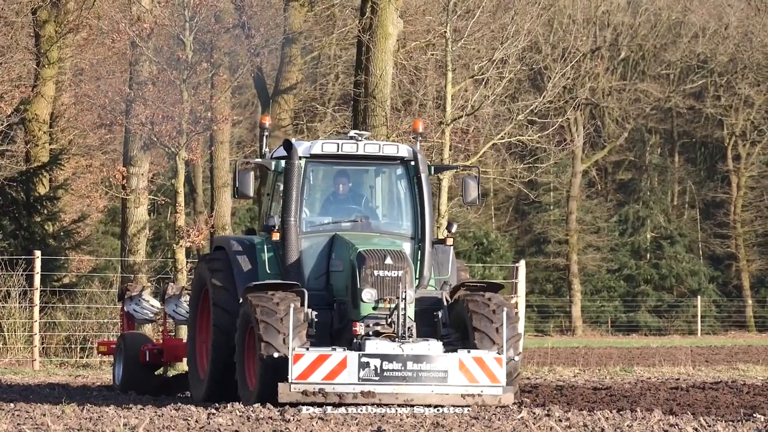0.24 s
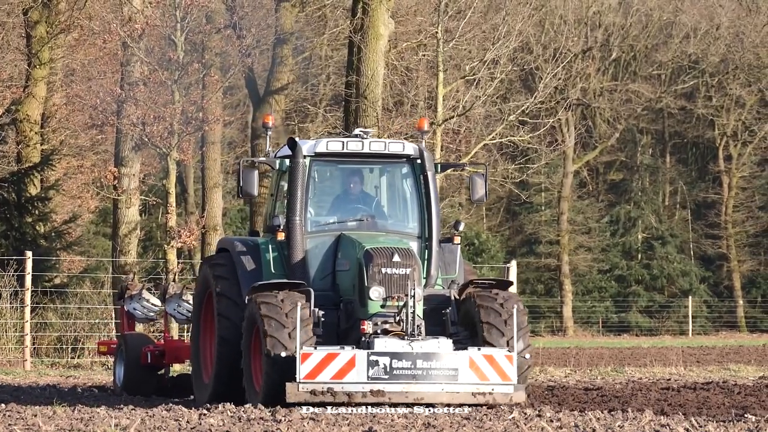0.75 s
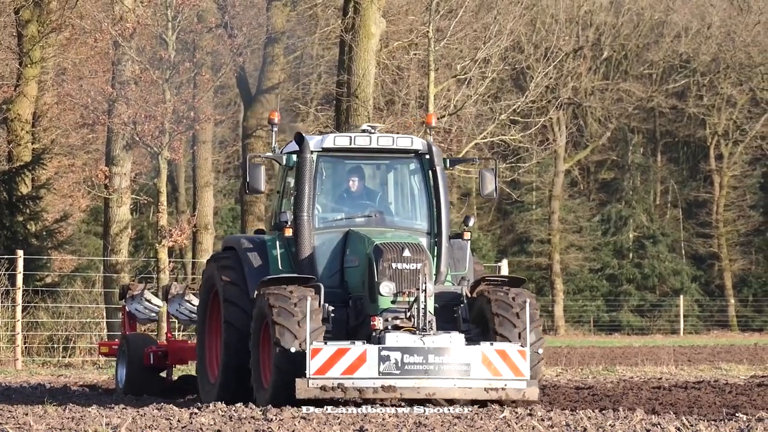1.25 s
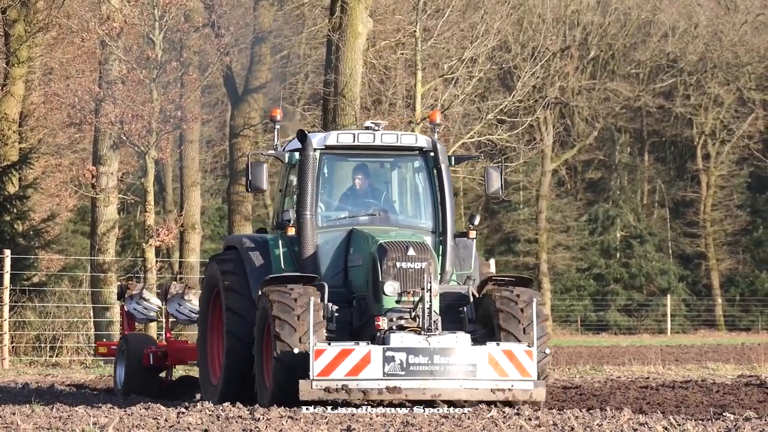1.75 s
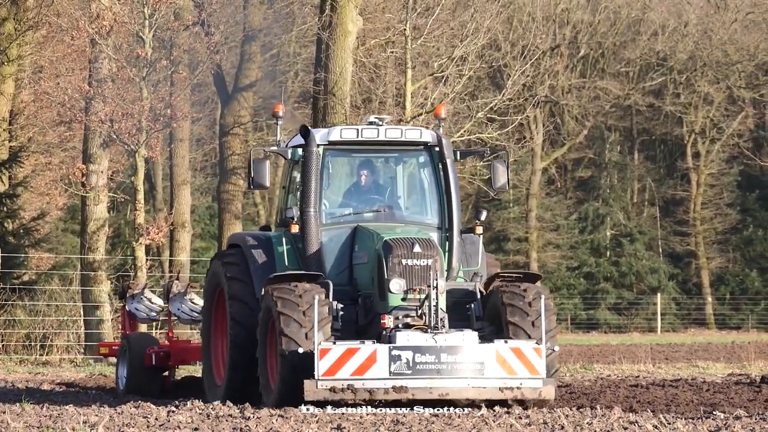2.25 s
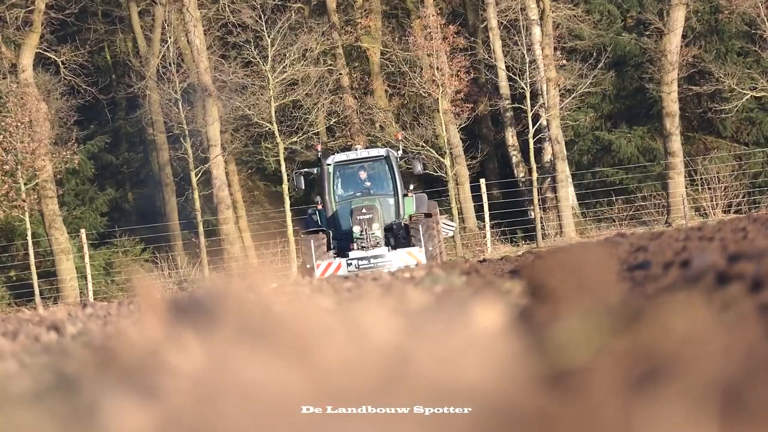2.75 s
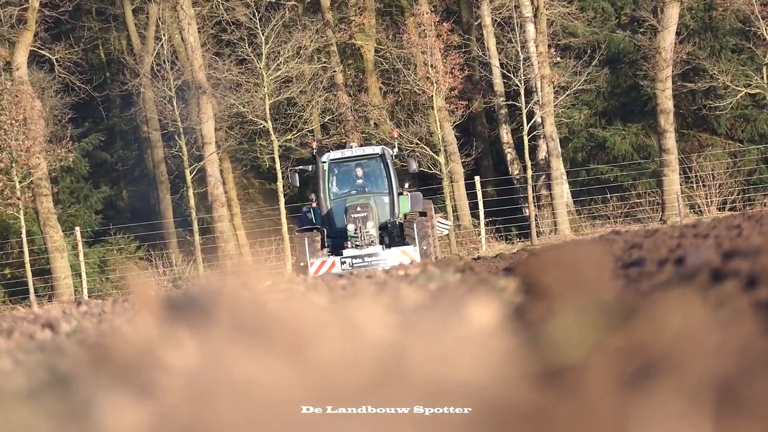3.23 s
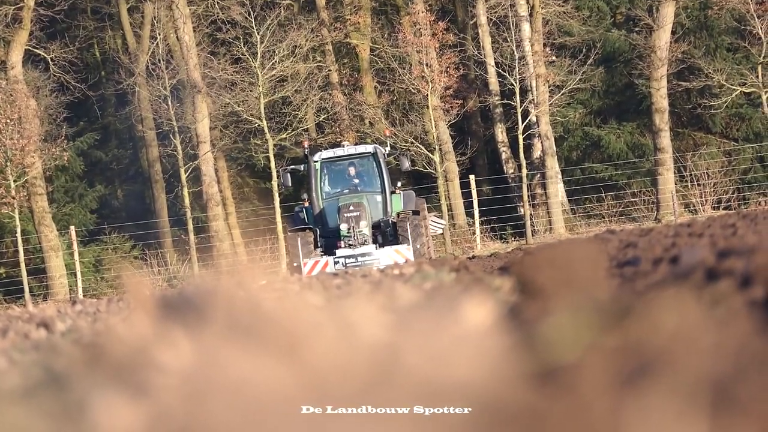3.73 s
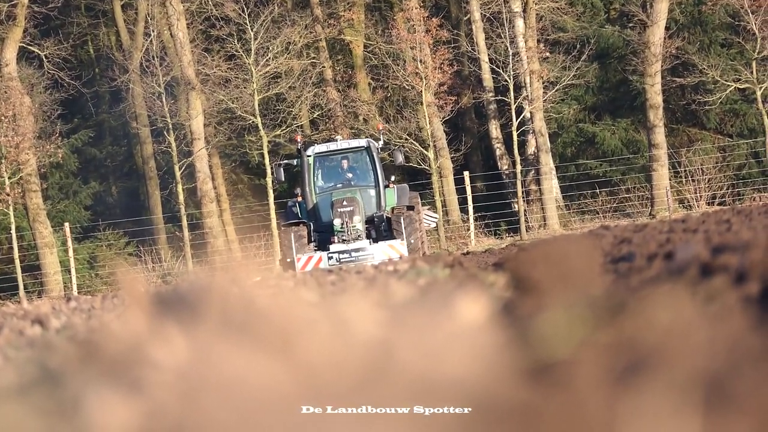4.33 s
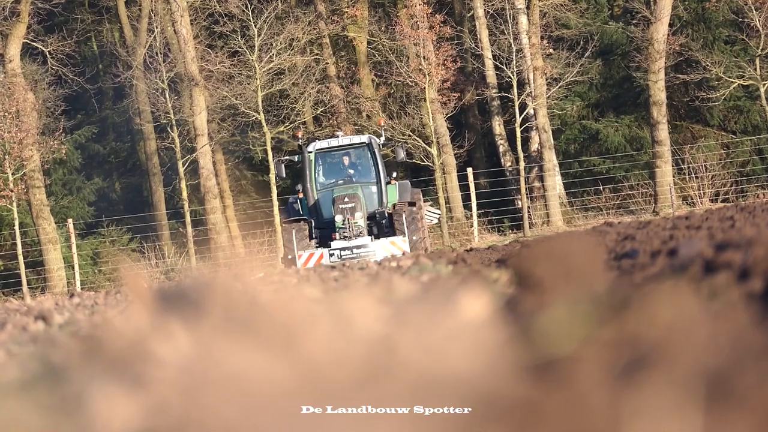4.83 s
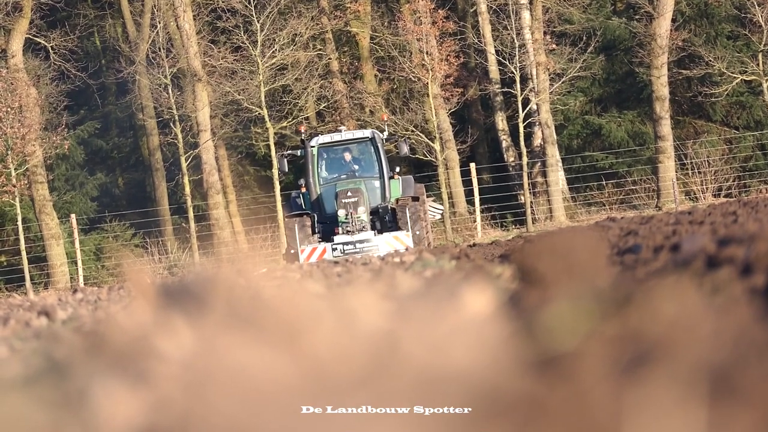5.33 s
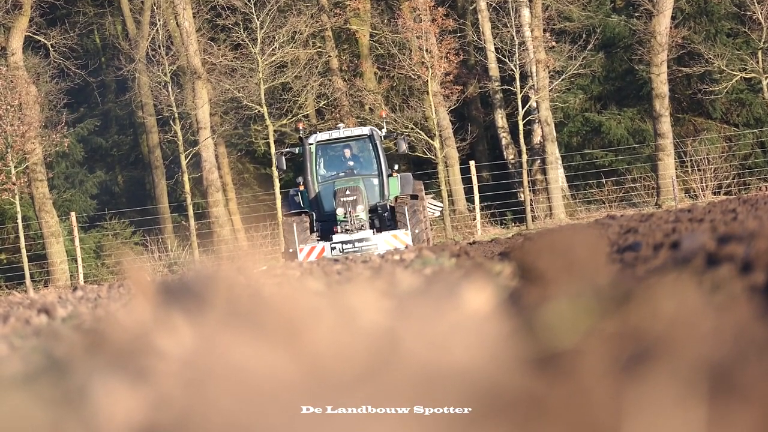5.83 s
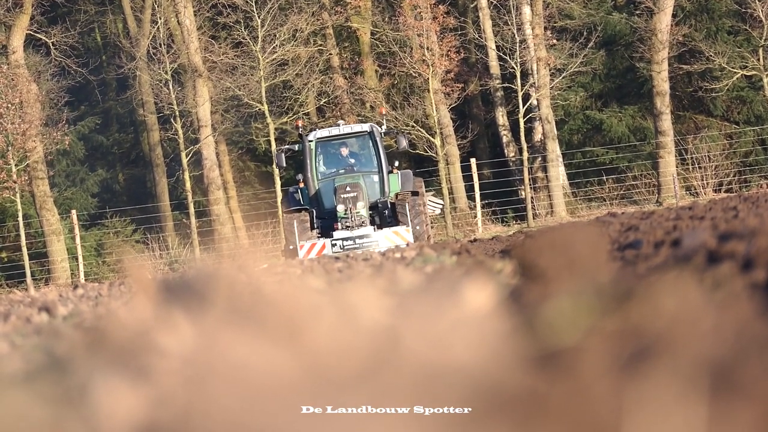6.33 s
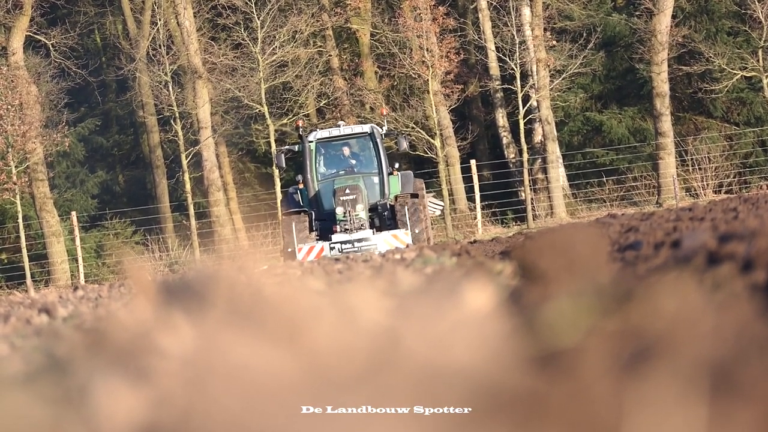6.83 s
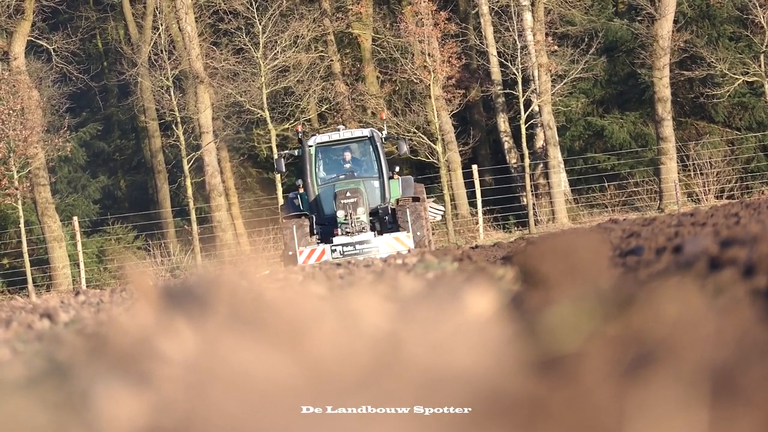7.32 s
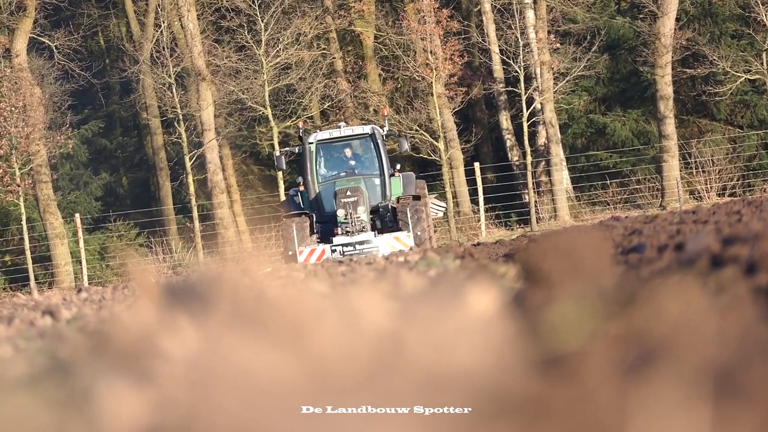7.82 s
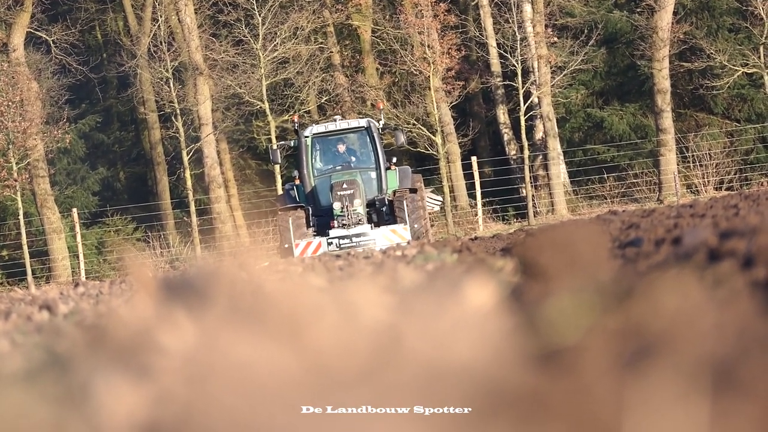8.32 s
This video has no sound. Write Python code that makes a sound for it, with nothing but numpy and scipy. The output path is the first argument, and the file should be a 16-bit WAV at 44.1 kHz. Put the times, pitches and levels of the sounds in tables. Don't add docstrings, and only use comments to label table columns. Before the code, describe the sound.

A tractor pulls a plough in an open field. First its diesel is close and loud, with low throbbing exhaust, dense clatter and a few hard metallic knocks. Under three seconds in, the view jumps far away: the engine becomes a much quieter, faster, blurred drone with a thin whine, faint stone clinks, small metal chirps and a brief dry squeak. Light low wind bumps touch the microphone; nearly mono.

```python
import sys
import numpy as np
from scipy import signal
from scipy.fft import rfft, irfft, next_fast_len
from scipy.io import wavfile
from scipy.ndimage import uniform_filter1d

SR = 44100
rng = np.random.default_rng(int(sys.argv[2]) if len(sys.argv) > 2 else 0)


def gain_from_decibels(decibels):
    exponent = np.asarray(decibels, float) / 20
    return 10 ** exponent


def file_out(sig):
    cols = np.atleast_2d(sig).T
    lim = np.clip(cols, -1, 1)
    pcm = np.round(lim * 32767).astype(np.int16)
    wavfile.write(sys.argv[1], SR, pcm)


N = 377937

# (frequency [Hz], density [dB per Hz])
HISS_COLOUR = [(2000, 0), (8000, 0), (10000, -.7), (13000, -2), (15500, -2.5)]
# (frequency [Hz], side minus mid [dB])
PORT_DIFFERENCE = [(30, -37), (70, -56), (150, -67), (300, -41.5), (700, -32), (1400, -31), (2800, -24),
                   (5000, -16.5), (9000, -7)]
# (time [s], peak level [dB], length [s])
GUSTS = [
    (.1, -53, .1),
    (1.55, -61, .06),
    (1.81, -57, .05),
    (2.17, -46, .12),
    (2.6, -50, .12),
    (3.95, -62, .1),
    (5.54, -59, .1),
    (5.98, -57, .1),
    (6.7, -64, .2),
    (7.39, -56, .06),
]
# (start [s], length [s], first frequency [Hz], fall [Hz per s], level [dB])
SQUEAK = (6.885, .485, 3718, 175, -67.5)
# (time [s], peak level [dB], frequency [Hz], 60 dB decay [s])
CHIRPS = [(4.76, -51, 3780, .04), (5.405, -60, 3750, .03), (5.421, -48, 3850, 0.044),
          (5.443, -53, 3800, .04), (5.481, -46.5, 3780, 0.038), (5.5, -58, 3700, .03),
          (5.64, -60, 3970, .04), (6.113, -58, 3780, .1), (6.172, -56, 3250, .05), (6.84, -60, 3350, .04),
          (7.395, -57, 3900, .05), (7.752, -52, 3650, .05), (8.14, -62, 3650, .05)]
# (time [s], peak level [dB], frequency [Hz], 60 dB decay [s])
STONE_CLINKS = [
    (4.7067, -49, 2050, 0.05),
    (4.8788, -46, 2360, 0.05),
    (5.1248, -51, 2150, 0.05),
    (5.5423, -48, 2260, 0.059),
    (5.7249, -43, 2550, 0.035),
    (6.558, -47, 2560, 0.065),
    (7.0394, -49, 2600, 0.05),
]
# (time [s], level [dB], 60 dB decay [s])
SNAPS = [
    (.04, -69, .02),
    (.063, -63, .02),
    (.676, -52, .02),
    (1.42, -54, .02),
    (2.016, -67, .02),
    (2.291, -53, .02),
    (2.549, -55, .02),
]
# (time [s], peak level [dB], frequency [Hz], 60 dB decay [s])
HARD_KNOCKS = [
    (0.678, -20.5, 3010, 0.026),
    (1.334, -14.5, 1160, 0.023),
    (1.595, -18.5, 900, 0.021),
    (2.062, -18, 1160, 0.024),
    (2.27, -15.5, 1264, 0.014),
    (2.55, -17, 1250, 0.028),
]
# (time [s], swell [dB], length [s])
CAB_BOOMS = [(.87, -1.5, 0.1), (1.45, 2.2, .28), (3.01, 3, 0.064), (3.346, 3.5, .07), (3.8, 1.5, 0.12),
             (4.48, 4, 0.11), (5.298, 2.5, 0.18), (5.75, 2.5, .1), (6.626, 5, .08), (6.997, 2, 0.11),
             (7.78, 1.5, 0.15), (8.42, 1, 0.072)]
# (time [s], level [dB])
VALVE_FACING = [(0.0, 3), (.5, 4.5), (.83, -1), (1.5, -1), (1.82, -3), (2.5, -.5), (2.69, -.5), (2.7, 4.5),
                (3.8, 2.5), (4.2, -2), (5, -2), (6.2, .5), (7.3, -.5)]

# (start [s], end [s])
VIEW_CHANGE = (2.638, 2.69)
# (time [s], firing rate [firings per s])
NEAR_SPEED = [(0.0, 43.0), (0.12, 43.97), (0.97, 44.59), (1.47, 42.28), (2.02, 42.79), (2.19, 44.11),
              (2.68, 41.11)]
FAR_SPEED = [(2.68, 49.72), (3.279, 49.21), (3.788, 50.64), (4.737, 46.83), (5.336, 53.61), (5.425, 53.12),
             (6.224, 51.61), (6.663, 52.57), (7.252, 54.26), (8.071, 52.41), (8.57, 53.32)]
# (time [s], level [dB])
NEAR_EXHAUST = [(0.0, -29.5), (0.83, -31), (1.6, -29.5), (1.95, -30), (2.64, -30.5)]
FAR_EXHAUST = [(2.7, -43), (3.35, -42.3), (3.85, -43.1), (4.45, -41.5), (5.15, -41.5), (5.47, -45.5),
               (6.2, -42), (7.05, -42.4), (7.7, -45.5), (8.1, -42.5), (8.57, -44)]
# (multiple of the firing rate, level [dB])
NEAR_ORDERS = [(1, -15), (2, 1), (3, -3.5), (4, -2), (5, -6), (6, -19), (7, -21), (8, -21.5)]
FAR_ORDERS = [(1, -14.5), (2, -7), (3, -10), (4, -19)]
# (level at mean speed [dB], gain under load [dB per firing/s of sag], gain on approach [dB per s])
NEAR_LOAD = (-29, 0.18, 0.)
FAR_LOAD = (-53.5, 0.098, 0.19)
CYLINDERS = [0.52, 1, 0.67, 0.17]
# (centre [Hz], start [share of a firing], rise [ms], fall [dB per ms], valve tick [dB],
# steady part [dB], spread [dB], share of valve facing, share of cab boom)
NEAR_KNOCK = [(190, -.2, 3., .5, -20, -1.5, 1.5, 0, 1.1), (560, -.16, 3.2, 2.8, -22, -11.5, 1.6, 0, .9),
              (1100, -.17, 3.2, 2.8, -22, -13, 1.6, 0, 0), (2000, -.16, 3.2, 2.9, -22, -16, 1.6, 0, 0),
              (2900, -.14, 3.3, 3., -24, -20, 2.1, 0, .7), (3800, -.12, 3.2, 3.2, -7, -17, 1.9, .4, 0),
              (5000, -.11, 2.8, 3.4, -8, -11, 2.2, .9, 0), (6600, -.09, 2.8, 3., -9, -8, 2.2, 1.4, 0),
              (8500, -.07, 2.8, 3., -14, -5, 2.2, .1, 0)]
FAR_KNOCK = [(200, -.1, 3., .6, -9, 8, 1.5, 0, 0), (290, -.1, 3., .6, -9, 8, 1.5, 0, 1.4),
             (420, -.1, 3., 1.2, -9, 3, 1.5, 0, 0), (1500, -.1, 3., 1.2, -6, 3, 1.5, 0, 0),
             (3600, -.04, 3., 1.2, -3, -1.5, 2.5, .12, 0), (4900, -.04, 3., 1.2, -3, 3, 1.5, .15, 0),
             (5350, .02, 3., 2.5, 4, -9, 3., 1.5, 0), (5800, .02, 3., 1.5, -3, 8, 1., .1, 0)]
# (frequency [Hz], density [dB per Hz])
NEAR_COLOUR = [(40, -29.5), (60, -27.5), (110, -7.5), (190, -6.5), (250, -6.5), (410, -9), (1030, -2.5),
               (1450, -5), (2630, -10.5), (3650, -11.5), (4250, -19.5), (5900, -31), (7000, -45.5),
               (10500, -49.5), (11500, -55.5), (15500, -71)]
FAR_COLOUR = [(40, -20.5), (70, -16), (120, -10.5), (240, -10.5), (400, -12.5), (520, -17), (1440, -19),
              (2830, -30), (3650, -34), (4380, -43), (5600, -48.5), (7000, -61), (9000, -82)]
# (frequency [Hz], width [Hz], height above the colour [dB])
NEAR_MODES = [(195, 29.5, 11.9), (288, 28, 4.1), (907, 170, 1.8), (1160, 170, 5.15), (2280, 110, 5),
              (2907, 170, 7.6), (3610, 73, 5.1), (3780, 84, 3.3), (5490, 130, 3.8), (7400, 140, 2.1)]
FAR_MODES = [(285, 18, 11), (345, 14, 6.5), (2140, 100, 2), (2790, 60, 7.5), (3650, 150, 2), (5360, 160, 6)]


def evened(x):
    return x / np.sqrt(np.mean(x ** 2) + 1e-20)


def read(points, hz):
    f, value = np.transpose(points)
    return np.interp(np.log(hz + 1), np.log(f + 1), value)


def over_time(points, t):
    return np.interp(t, *np.transpose(points))


def bandpass(x, order, low_hz, high_hz):
    return signal.sosfilt(signal.butter(order, [low_hz, high_hz], "band", fs=SR, output="sos"), x)


def shaped(x, db_of_hz):
    size = next_fast_len(len(x) + 8192)
    log_gain = np.log(gain_from_decibels(np.maximum(db_of_hz(np.fft.rfftfreq(8192, 1 / SR)), -120)))
    whole = np.concatenate([log_gain, log_gain[-2:0:-1]])
    taps = np.fft.ifft(np.exp(np.conj(signal.hilbert(whole)))).real[:4096]
    return irfft(rfft(x, size) * rfft(taps, size), size)[:len(x)]


def drift(count, hz):
    points = int(count / SR * hz * 2) + 3
    return np.interp(np.linspace(0, points - 1, count), np.arange(points), rng.standard_normal(points)) * 0.57


def swell(t, s, length):
    return np.exp(-((t - s) / length) ** 2)


def add(mix, s, sound):
    part = mix[round(s * SR):][:len(sound)]
    part += sound[:len(part)]


def microphone_hiss():
    mid, side = (evened(shaped(rng.standard_normal(N), lambda f: read(HISS_COLOUR, f))) for _ in range(2))
    side = gain_from_decibels(-6) * side
    return gain_from_decibels(-72.5) * np.array([mid + side, mid - side])


def wind(t):
    calm_db, port_gain_db = -66, 2
    lumps = gain_from_decibels(1.5 * drift(len(t), 7.1)) * rng.standard_normal(len(t))
    rumble = evened(bandpass(lumps, 3, 24, 48))
    gusts = sum(gain_from_decibels(db) * swell(t, s, length) for s, db, length in GUSTS)
    return gain_from_decibels(port_gain_db) * (gain_from_decibels(calm_db) + gusts) * rumble


def squeak():
    start, length, hz, fall, db = SQUEAK
    t = np.arange(0, length, 1 / SR)
    turns = np.cumsum(hz - fall * t + 45 * drift(len(t), 110)) / SR
    grip_db = 4.5 * np.minimum(drift(len(t), 35), .9)
    return start, gain_from_decibels(db + grip_db) * np.sin(2 * np.pi * turns) * signal.windows.tukey(len(t), .08)


def metal_ring(db, hz, t60, rise_ms):
    t = np.arange(3000) / SR
    pair = np.sin(2 * np.pi * hz * t) + 0.68 * np.sin(2 * np.pi * hz * 0.95 * t + 0.8)
    dying = gain_from_decibels(db - 60 * t / max(t60, .002))
    return dying * np.minimum(t * 1000 / rise_ms, 1) * pair * 0.57


def snap(db, t60):
    spit = bandpass(rng.standard_normal(1200), 3, 6500, 12500)
    return gain_from_decibels(db - 60 * np.arange(1200) / SR / np.clip(t60, .005, .04)) * spit


def exhaust(turns, orders, lead, lag_per_order, flutter_db, shake):
    out = 0
    for k, db in orders:
        waver_db = flutter_db * np.sqrt(k) * drift(len(turns), 9)
        phase = 2 * np.pi * k * turns + lead - lag_per_order * k + shake * k * drift(len(turns), 9)
        out = out + gain_from_decibels(db + waver_db) * np.cos(phase)
    return evened(out)


def clatter(turns, rate, facing_db, boom_db, knock, colour, modes, patchy_db):
    centres = np.log([row[0] for row in knock])
    luck = np.clip(rng.standard_normal((int(turns[-1]) + 3, len(knock) + 1)), -1.8, 1.4)
    out = 0
    for k, row in enumerate(knock):
        _, start, rise_ms, fall_db, valve_db, steady_db, spread_db, facing, boom = row
        firing = np.floor(turns - start + 1).astype(int)
        progress = (turns - start) % 1
        ms = progress / rate * 1000
        blow = np.minimum(ms / rise_ms, 1) ** 2 * gain_from_decibels(-fall_db * np.maximum(ms - rise_ms, 0))
        valve = gain_from_decibels(valve_db + 1.1 * facing_db) * swell(progress, .42, .05)
        luck_db = spread_db * (0.68 * luck[firing, k] + 0.72 * luck[firing, -1])
        strength_db = luck_db + np.take(CYLINDERS, (firing + 2) % 4)
        steady = gain_from_decibels(steady_db + patchy_db * drift(len(turns), 12))
        gate = evened(np.sqrt((gain_from_decibels(strength_db) * (blow + valve)) ** 2 + steady ** 2))
        gate = gate * gain_from_decibels(facing * facing_db + boom * boom_db)

        def body_db(f):
            share = np.interp(np.log(f + 1), centres, np.arange(len(knock)) == k)
            rings = sum((gain_from_decibels(db) - 1) / (1 + (2 * (f - hz) / width) ** 2) for hz, width, db in modes)
            return read(colour, f) + 20 * np.log10(1 + rings) + 10 * np.log10(share + 1e-8)

        out = out + shaped(gate * rng.standard_normal(len(turns)), body_db)
    return out / np.sqrt(np.mean(bandpass(out, 4, 480, 4500) ** 2))


def tractor(t, speed, first_turn, exhaust_level, load, orders, pipe_db, lead, lag, flutter_db, shake,
            knock, colour, modes, patchy_db):
    rate = over_time(speed, t)
    turns = np.cumsum(rate) / SR
    turns = turns - np.interp(speed[0][0], t, turns) + first_turn + 3
    exhaust_db = over_time(exhaust_level, t) + pipe_db
    pulses = gain_from_decibels(exhaust_db) * exhaust(turns, orders, lead, lag, flutter_db, shake)
    facing_db = over_time(VALVE_FACING, t)
    facing_db = facing_db - facing_db.mean()
    boom_db = sum(db * swell(t, s, length) for s, db, length in CAB_BOOMS)
    boom_db = boom_db - boom_db.mean()
    at_mean_db, per_sag_db, per_second_db = load
    knock_db = at_mean_db + per_sag_db * (rate.mean() - rate) + per_second_db * (t - t[0])
    return pulses + gain_from_decibels(knock_db) * clatter(turns, rate, facing_db, boom_db, knock, colour, modes, patchy_db)


def scene():
    t = np.arange(N) / SR
    fade = np.clip((t - VIEW_CHANGE[0]) / (VIEW_CHANGE[1] - VIEW_CHANGE[0]), 0, 1)
    near, far = t < 2.75, t > 2.6
    mid = np.zeros(N)
    mid[near] = tractor(
        t[near], NEAR_SPEED, .148, NEAR_EXHAUST, NEAR_LOAD, NEAR_ORDERS, pipe_db=2.0, lead=1.44, lag=0.48,
        flutter_db=0.35, shake=0.087, knock=NEAR_KNOCK, colour=NEAR_COLOUR, modes=NEAR_MODES, patchy_db=0.0)
    mid *= 1 - fade
    mid[far] += fade[far] * tractor(
        t[far], FAR_SPEED, -.054, FAR_EXHAUST, FAR_LOAD, FAR_ORDERS, pipe_db=-.3, lead=.4, lag=.01,
        flutter_db=1.1, shake=.09, knock=FAR_KNOCK, colour=FAR_COLOUR, modes=FAR_MODES, patchy_db=-0.5)
    mid += wind(t)
    for s, db, hz, t60 in HARD_KNOCKS:
        add(mid, s, metal_ring(db + 7, hz, t60, rise_ms=1.54))
    for s, db, t60 in SNAPS:
        add(mid, s, snap(db, t60))
    for s, db, hz, t60 in STONE_CLINKS + CHIRPS:
        add(mid, s, metal_ring(db + 2.5, hz, t60, rise_ms=3.6))
    add(mid, *squeak())
    scatter = rng.standard_normal(3000) * np.exp(-np.arange(3000) / 700)
    scattered = signal.oaconvolve(mid, scatter / np.linalg.norm(scatter))[:N]
    side = shaped(scattered, lambda f: read(PORT_DIFFERENCE, f))
    return np.array([mid + side, mid - side])


def thinned(x, from_hz, until_s, patchy_db, holes):
    count = round(3.2 * SR)
    head = x[:, :count]
    hz, t, z = signal.stft(head, SR, nperseg=1024)
    patches = uniform_filter1d(rng.standard_normal(z.shape[1:]), size=4, axis=0)
    patches = evened(uniform_filter1d(patches, size=3, axis=1))
    reach = np.clip((hz[:, None] - from_hz) / 700, 0, 1) * (t < until_s)
    gain_db = np.where(patches < holes, -25, patchy_db * np.minimum(patches, 1.3))
    gain_db = gain_db - 1.5 * (hz[:, None] > 11500)
    head = signal.istft(z * gain_from_decibels(reach * gain_db), SR, nperseg=1024)[1][:, :count]
    return np.concatenate([head, x[:, count:]], axis=1)


def low_pass(x):
    return signal.sosfilt(signal.butter(12, 15690, fs=SR, output="sos"), x)


def record(dry):
    heard = thinned(dry + microphone_hiss(), from_hz=6000, until_s=2.62, patchy_db=4, holes=-.5)
    return low_pass(heard)


dry = scene()
out = record(dry)
file_out(out)
```